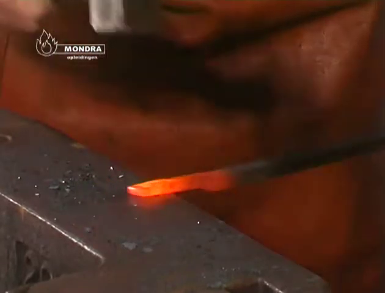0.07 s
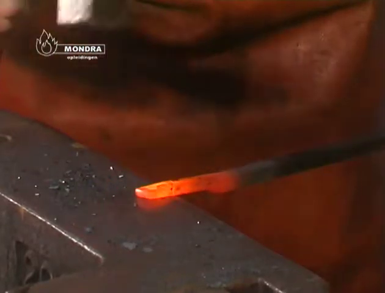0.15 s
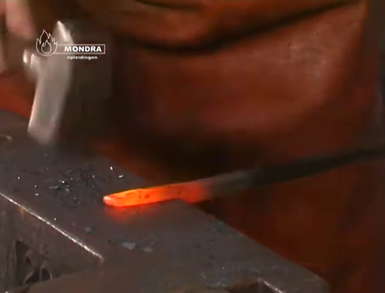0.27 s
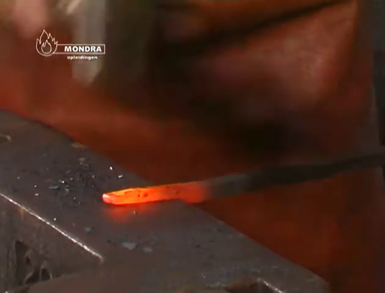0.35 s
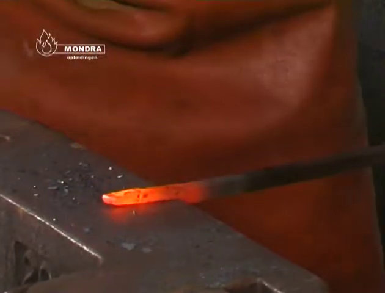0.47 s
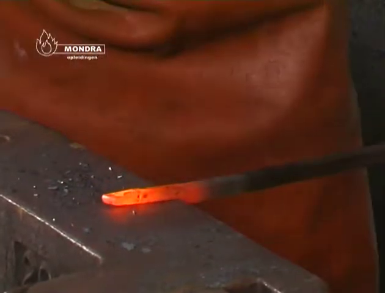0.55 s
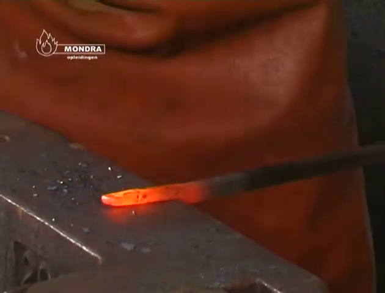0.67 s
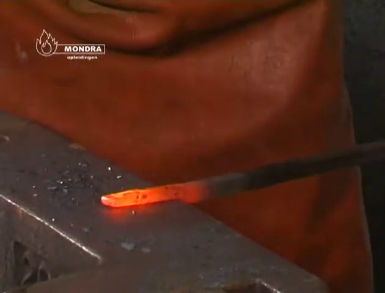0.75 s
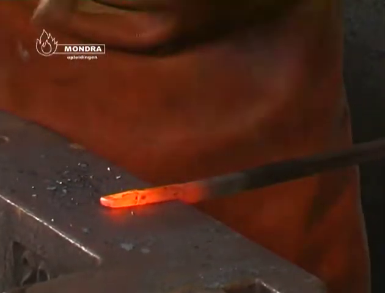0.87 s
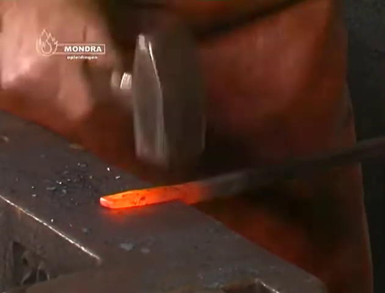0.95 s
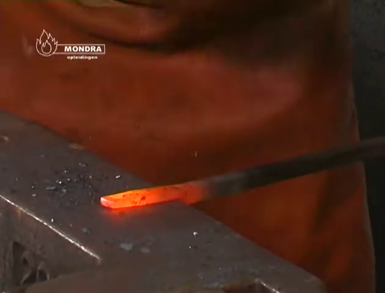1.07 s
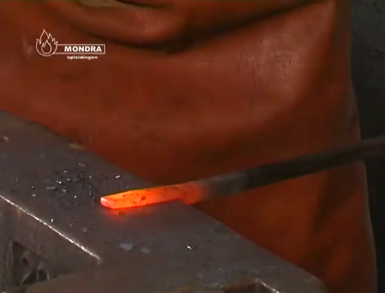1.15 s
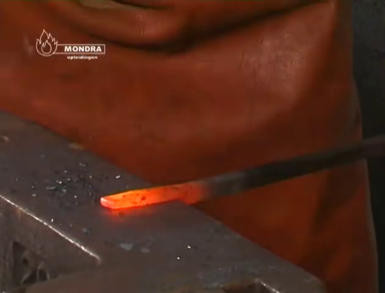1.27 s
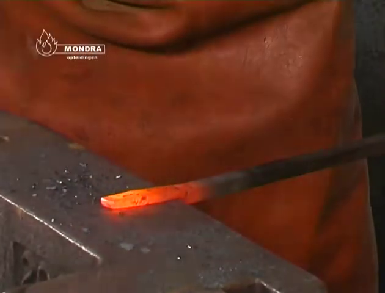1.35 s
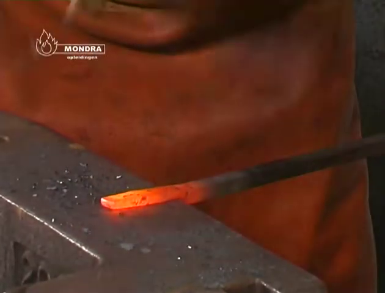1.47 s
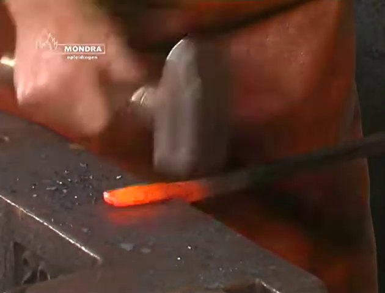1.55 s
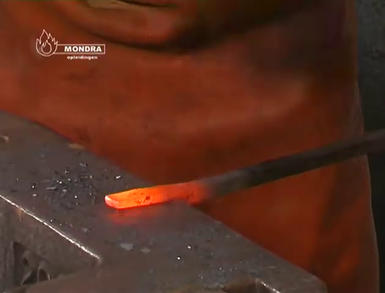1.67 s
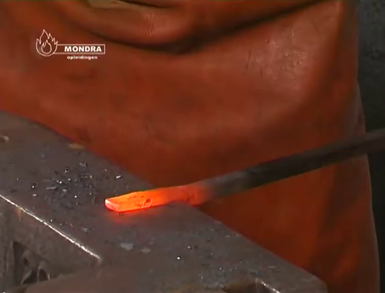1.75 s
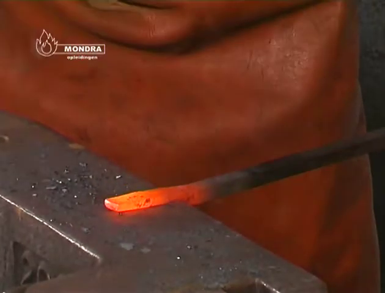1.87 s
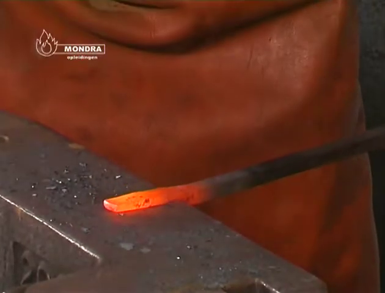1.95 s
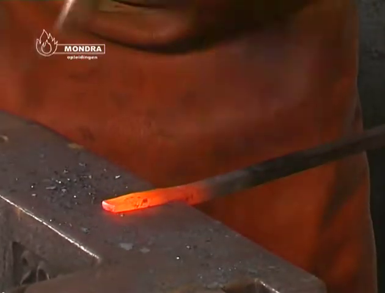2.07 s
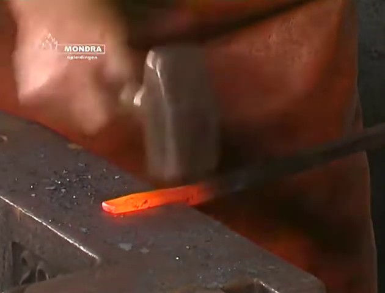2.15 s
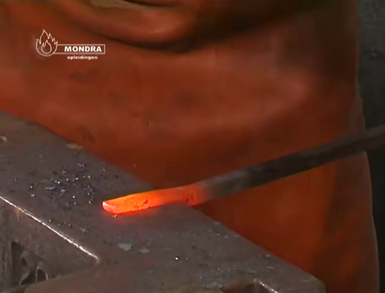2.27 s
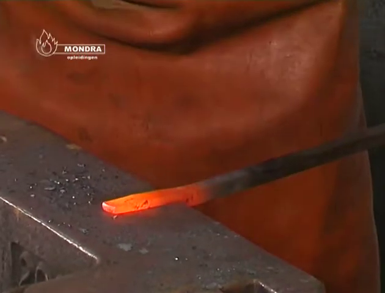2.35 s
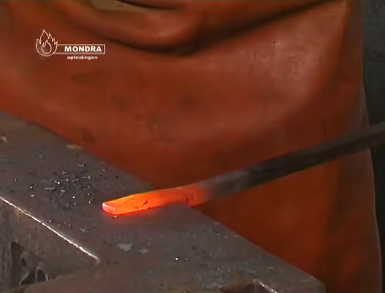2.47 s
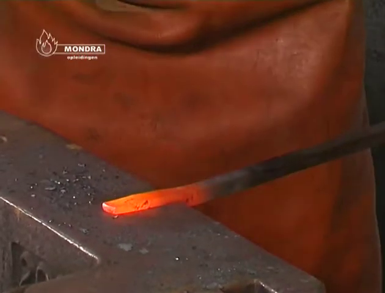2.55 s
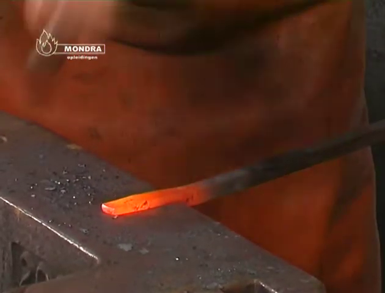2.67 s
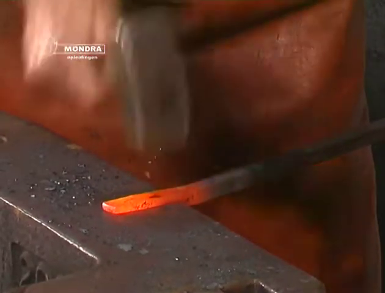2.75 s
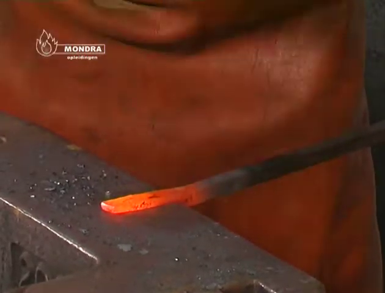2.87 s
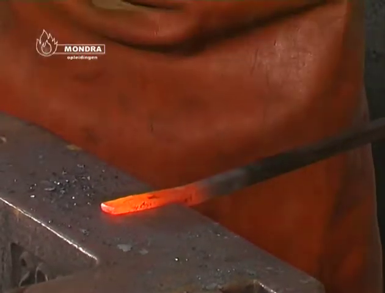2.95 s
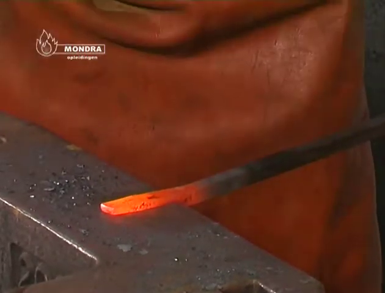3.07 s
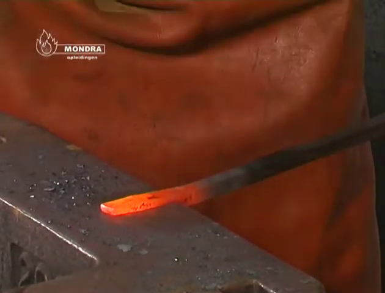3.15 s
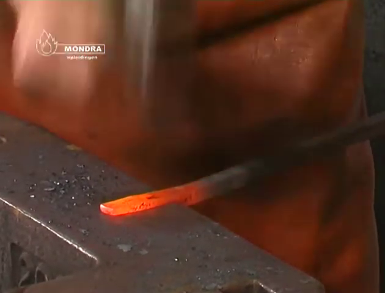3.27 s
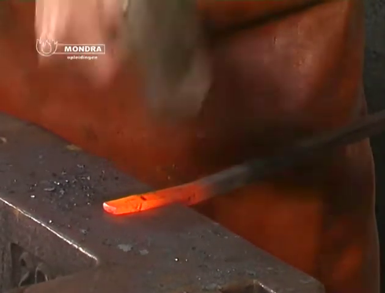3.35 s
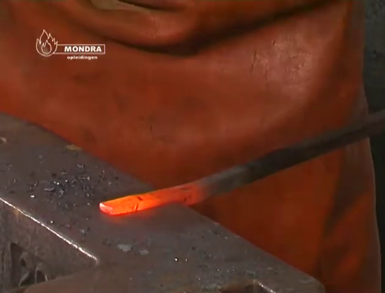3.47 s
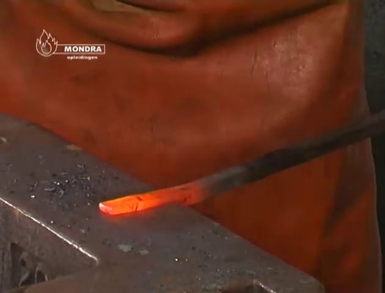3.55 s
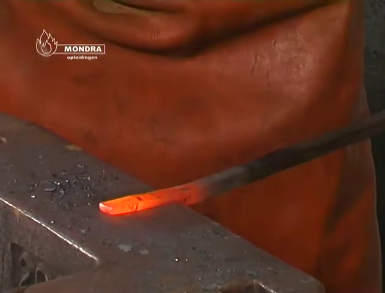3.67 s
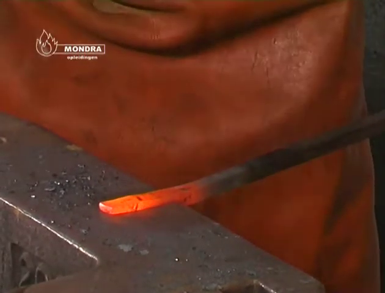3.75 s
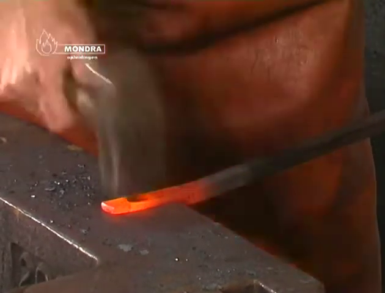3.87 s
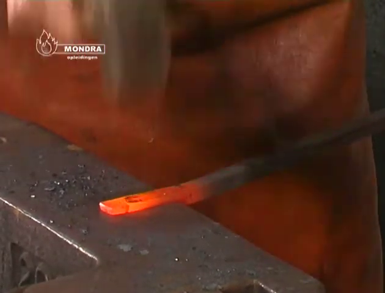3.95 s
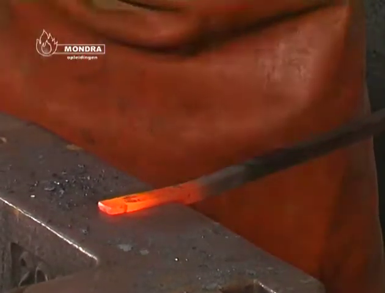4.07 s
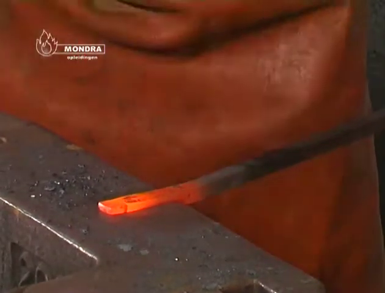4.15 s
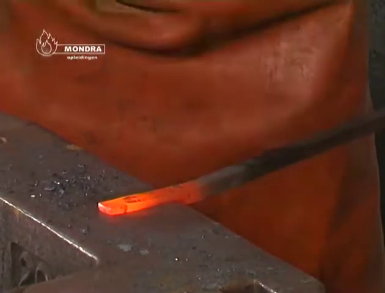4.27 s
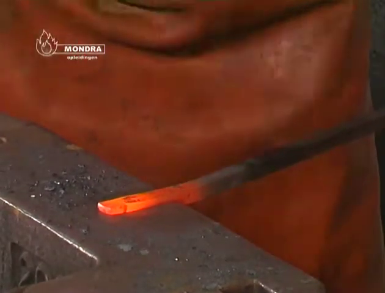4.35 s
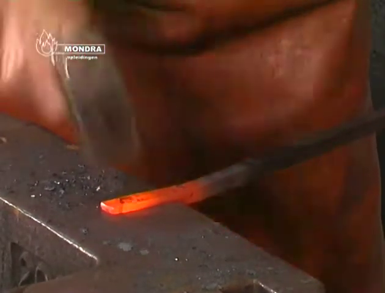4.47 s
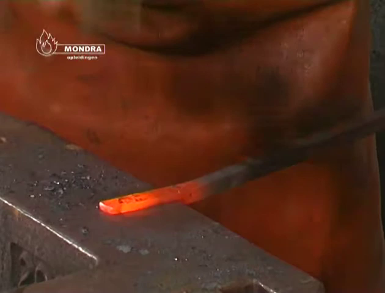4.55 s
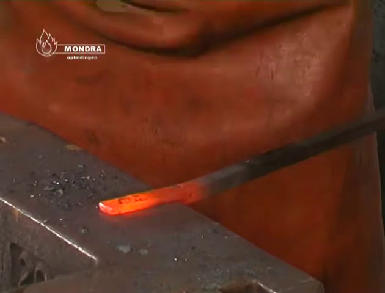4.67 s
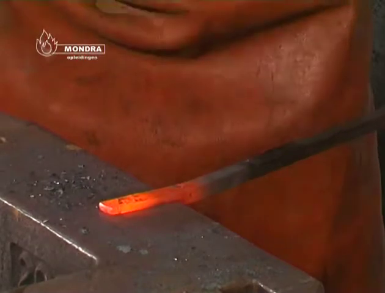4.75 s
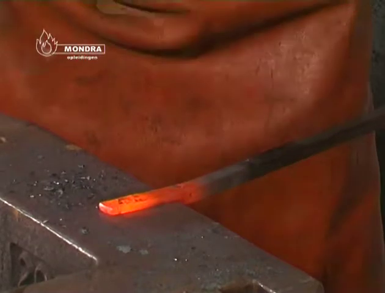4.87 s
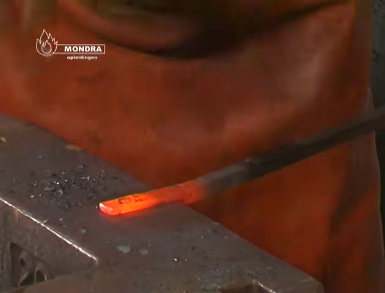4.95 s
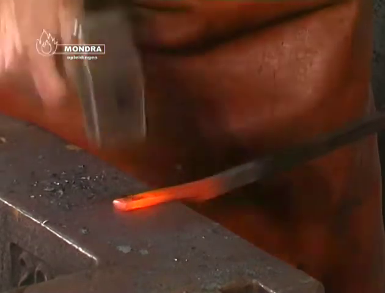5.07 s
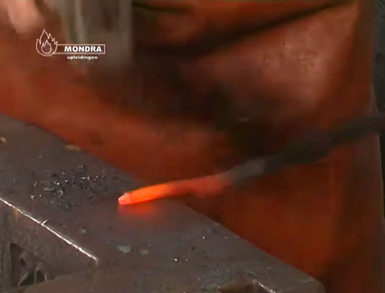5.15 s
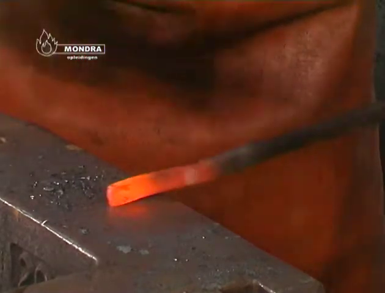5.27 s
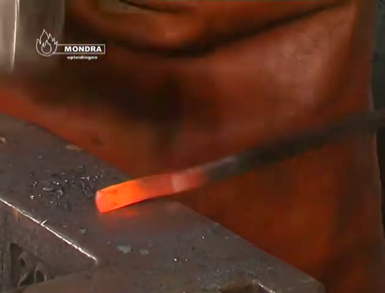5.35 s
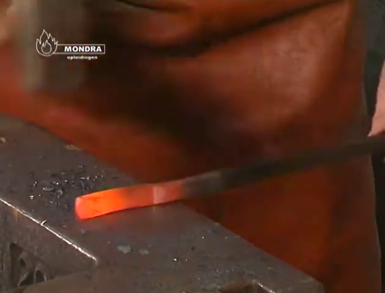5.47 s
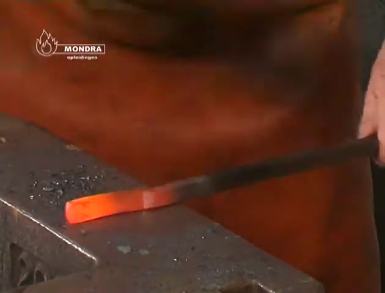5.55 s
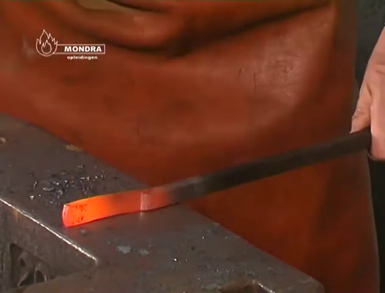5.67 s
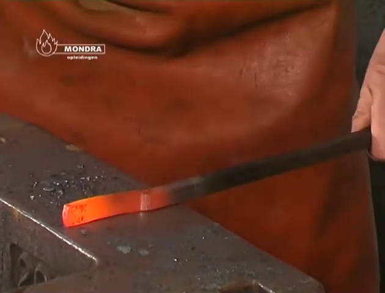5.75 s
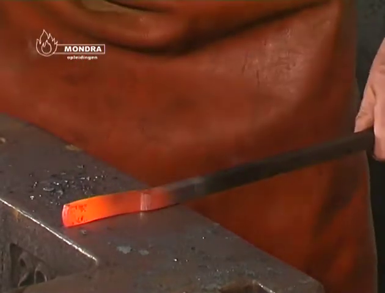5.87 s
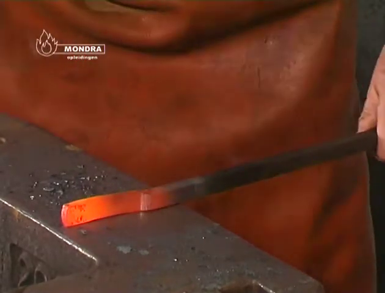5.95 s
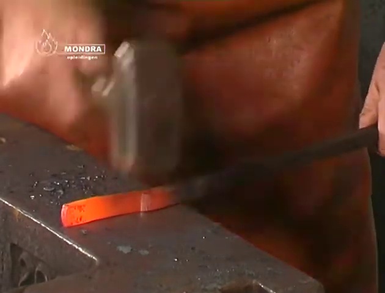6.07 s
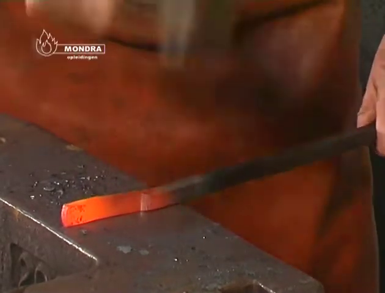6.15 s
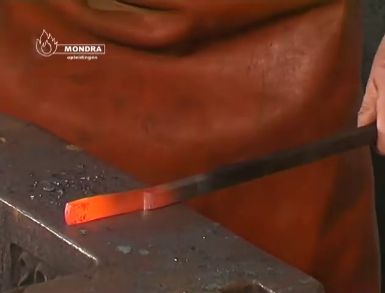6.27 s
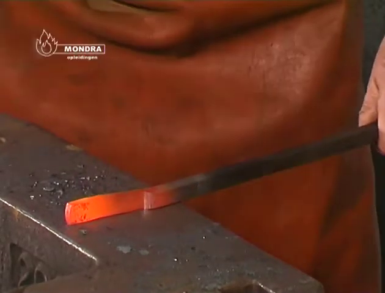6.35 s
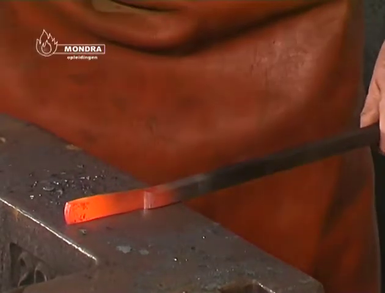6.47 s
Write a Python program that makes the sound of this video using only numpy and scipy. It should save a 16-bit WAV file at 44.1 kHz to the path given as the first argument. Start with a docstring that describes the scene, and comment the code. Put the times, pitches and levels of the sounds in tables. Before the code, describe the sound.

Steady hammer blows crash on a glowing bar, the anvil ringing after each, with two cleaner taps on bare steel and a low blower hiss behind.

```python
"""Nearly two hammer blows a second strike a hot bar on an anvil in a hard-walled workshop.
Each blow is a burst of filtered noise and damped tones, a set of ringing anvil tones and a low floor thump.
Twice the hammer drops on the bare face while the bar is turned, which gives a cleaner ring.
Behind it lie blower rumble, hiss and a thin whine. A limiter turns down the loud moments."""
import sys
import numpy as np
from scipy import signal
from scipy.fft import rfft, irfft, next_fast_len
from scipy.io import wavfile
from scipy.ndimage import uniform_filter1d

SR = 44100
rng = np.random.default_rng(int(sys.argv[2]) if len(sys.argv) > 2 else 0)


def wrap_up_sound(samples):
    """Save the sound to the file named by the first command line argument, as 16-bit audio."""
    columns = np.atleast_2d(samples).T
    # keep every value between -1 and 1, then stretch to whole-number steps
    tamed = np.clip(columns, -1, 1)
    steps = np.round(tamed * 32767).astype(np.int16)
    wavfile.write(sys.argv[1], SR, steps)


N = 287071

# Overtones of anvil and hammer. Columns: f/Hz, t60/s (time to fall 60 dB), relative level through the bar/dB,
# change of level per unit of place/dB, relative level on the bare face/dB
OVERTONES = [(1197.0, 0.62, -41.4, -3.6, -38.5), (2222.0, 1.2, -41.9, -4.0, -50.0),
             (2928.0, 0.7, -37.6, -2.9, -38.0), (3145.0, 0.6, -46.8, -3.6, -43.0),
             (3217.0, 0.8, -43.0, -5.1, -37.4), (3298.0, 0.9, -39.4, 0.3, -48.0),
             (4171.0, 1.2, -39.1, 4.7, -41.1), (4472.0, 0.5, -46.9, -0.2, -38.9),
             (4674.0, 0.75, -40.3, 2.5, -36.9), (4713.0, 0.8, -45.7, 3.7, -37.5),
             (5171.0, 0.8, -32.4, 1.9, -30.6), (5259.0, 1.3, -38.1, -6.5, -37.7),
             (5643.0, 0.55, -48.1, 0.9, -39.4), (6050.0, 0.6, -39.8, -3.2, -51.6),
             (6083.0, 0.5, -36.0, -4.8, -34.6), (6789.0, 0.42, -48.6, -3.3, -39.9),
             (6940.0, 0.4, -54.5, -6.5, -46.7), (7408.0, 0.55, -41.0, 2.9, -55.3),
             (7554.0, 0.4, -48.7, -1.4, -63.1), (7918.0, 0.45, -48.8, -1.4, -66.1),
             (8109.0, 0.4, -48.1, 2.6, -65.4), (8676.0, 0.42, -45.5, 6.7, -59.8),
             (9061.0, 0.45, -49.4, -1.6, -61.9), (10514.0, 0.4, -53.8, -0.3, -71.6),
             (10843.0, 0.3, -53.3, -0.0, -96.7), (11933.0, 0.33, -56.4, 10.7, -82.8),
             (12342.0, 0.45, -51.6, 9.0, -82.3), (13002.0, 0.33, -55.5, -3.2, -62.4),
             (13172.0, 0.3, -45.6, 5.4, -77.4)]
AGE = np.arange(int(1.3 * SR)) / SR   # seconds since a blow
EARLY = int(0.2 * SR)   # samples at the start of a blow over which its loudness is set


def from_db(db):
    """Turn decibels into a plain multiplier."""
    return 10 ** (np.asarray(db) / 20)


def at_hz(points, hz):
    """Read a curve of (Hz, value) points, with pitch on a logarithmic scale."""
    known_hz, values = np.transpose(points)
    return np.interp(np.log(np.maximum(hz, 1)), np.log(known_hz), values)


def early_rms_one(x):
    """Scale a sound so that its early part has an rms of 1."""
    return x / np.sqrt(np.mean(x[..., :EARLY] ** 2))


def dying(t60):
    """Envelope that falls 60 dB in t60 seconds."""
    return np.exp(-np.log(1000) * AGE / t60)


def delayed(x, s):
    """Make a sound start s seconds later, at the same length."""
    return np.pad(x, (max(round(s * SR), 0), 0))[:len(x)]


def add(out, sound, s):
    """Mix a stereo sound in from time s on, cutting off what falls outside."""
    at = round(s * SR)
    first, last = max(at, 0), min(at + sound.shape[1], N)
    out[:, first:last] += sound[:, first - at:last - at]


def coloured(x, *spectra):
    """Filter that gives white noise of rms 1 the summed spectra (dB per Hz), with no sound ahead of time."""
    size = 2 * next_fast_len(x.shape[-1] // 2 + 2048)
    hz = np.arange(size // 2 + 1) * SR / size
    level_db = sum(at_hz(points, hz) for points in spectra)
    gain = from_db(level_db) * np.sqrt(SR / 2)
    # the folded cepstrum gives the minimum-phase filter: the earliest response with this gain
    cepstrum = irfft(np.log(gain))[:size // 2]
    cepstrum[1:] *= 2
    response = np.exp(rfft(cepstrum, size))
    return irfft(rfft(x, size) * response)[..., :x.shape[-1]]


def stereo_noise(size, alike):
    """White noise whose left and right have the correlation alike (1 = the same)."""
    mid, side = rng.standard_normal((2, size))
    alike = np.clip(alike, -1, 1)
    middle = np.sqrt(1 + alike) * mid
    width = np.sqrt(1 - alike) * side * [[1], [-1]]
    return (middle + width) / np.sqrt(2)


def narrow_bass(x, below_hz=190):
    """Long waves reach both microphones nearly alike, so the bass has little left-right difference."""
    high_pass = signal.butter(1, below_hz, "high", fs=SR, output="sos")
    side = signal.sosfilt(high_pass, (x[0] - x[1]) / 2)
    return x.mean(0) + side * [[1], [-1]]


def ring(x, hz, t60):
    """One decaying mode driven by x, as a two-pole resonance."""
    r, w = np.exp(-np.log(1000) / (t60 * SR)), 2 * np.pi * hz / SR
    return signal.lfilter([0, np.sin(w)], [1, -2 * r * np.cos(w), r * r], x)


def background(whine_hz=15500, whine_db=-76):
    """Steady blower rumble and hiss from filtered noise, and a faint electronic whine from a sine."""
    # forge blower and hiss. Columns: f/Hz, level/dB per Hz
    hum_and_hiss = [(20, -76), (60, -73.5), (150, -78), (215, -72.5), (310, -88.5), (600, -94.5),
                    (1500, -82), (5000, -83), (7500, -89.5), (10000, -104), (15000, -122)]
    whine = from_db(whine_db) * np.sqrt(2) * np.sin(2 * np.pi * whine_hz * np.arange(N) / SR)
    return coloured(stereo_noise(N, alike=0.52), hum_and_hiss) + whine


def workshop(alike=0.28, low_mid_alike=-0.021, build_s=0.0027):
    """Dense echoes build up quickly, mostly die sooner in the treble, and spread widest below 900 Hz."""
    # how long the room rings. Columns: f/Hz, t60/s
    room_t60 = [(100, 1.7), (500, 1.204), (1500, 1.375), (2500, 1.277), (4500, 0.79), (7000, 0.76),
                (10000, 0.44), (14000, 0.44)]
    edges = np.r_[0, np.geomspace(900, 13000, 9), SR / 2]
    size = next_fast_len(len(AGE))
    hz = np.arange(size // 2 + 1) * SR / size
    low_part = rfft(stereo_noise(size, low_mid_alike))
    high_part = rfft(stereo_noise(size, alike))
    spectrum = np.where(hz < edges[1], low_part, high_part)
    tail = 0
    for low, high in zip(edges, edges[1:]):
        band = irfft(spectrum * ((hz >= low) & (hz < high)), size)[:, :len(AGE)]
        tail = tail + band * dying(at_hz(room_t60, (low + high) / 2))
    return early_rms_one(tail * (1 - np.exp(-AGE / build_s)))


def to_microphones(room, direct):
    """The straight path plus the room's echoes."""
    return room / np.sqrt(np.sum(room[0] ** 2)) + direct * signal.unit_impulse(len(AGE))


def thump(late_s=0.01202, lead=0.11):
    """The stand passes the blow to the floor; its two lowest modes beat about eight times a second."""
    # stand, floor and low room modes. Columns: f/Hz, t60/s, relative level/dB
    stand = [(59.6, 1.9, -38), (67.9, 1.33, -40), (98.1, 1.53, -45), (116.3, 2.03, -46),
             (143.8, 1.2, -47.5), (176, 0.71, -45.5), (199, 6.1, -55), (223.7, 2.03, -53)]
    phase = np.array([[lead], [-lead]]) / 2   # radians: left leads right
    modes = 0
    for k, (hz, t60, db) in enumerate(stand):
        mode = early_rms_one(np.sin(2 * np.pi * hz * AGE + phase) * dying(t60))
        modes = modes + (-1) ** k * from_db(db) * mode   # every other mode is turned over
    soft_start = 1 - dying(0.087)
    return np.array([delayed(side * soft_start, late_s) for side in modes])


def bar_partials(t60=0.11, count=150):
    """The many weak, quickly damped modes of bar and hammer head: partials x time."""
    hz = np.linspace(1400, 14300, count) + rng.uniform(-45, 45, count)
    return np.sin(2 * np.pi * hz[:, None] * AGE[:EARLY]) * dying(t60)[:EARLY]


def crash(room, partials, direct_db, clang_t60, partials_db, same_path=0.12, crack_db=-8.5, echoes_db=-3.0):
    """Hammer contact gives a crack, a short clang, damped tones and echoes that partly repeat each blow."""
    crack = early_rms_one(delayed(signal.unit_impulse(len(AGE)), 0.0003))
    clang = early_rms_one(rng.standard_normal(len(AGE)) * dying(clang_t60))
    clang = signal.sosfilt(signal.butter(1, 2000, "high", fs=SR, output="sos"), clang)
    same_path = np.clip(same_path, 0, 1)
    echoes = np.sqrt(same_path) * room + np.sqrt(1 - same_path) * workshop()
    # every blow shares its energy out anew among the partials
    jangle = rng.standard_normal(len(partials)) @ partials
    jangle = signal.fftconvolve(to_microphones(room, direct=1.0), jangle[None], axes=1)
    jangle = early_rms_one(jangle[:, :len(AGE)])
    dry_part = from_db(crack_db) * crack + from_db(direct_db) * clang
    return dry_part + from_db(echoes_db) * echoes + from_db(partials_db) * jangle


def overtones(room, wet_db=-4):
    """Each overtone sounds fully from the strike on, then swells in the room: modes x channels x time."""
    modes = []
    for hz, t60, *_ in OVERTONES:
        direct = early_rms_one(np.sin(2 * np.pi * hz * AGE) * dying(t60)) * rng.choice([-1, 1])
        swell = early_rms_one(ring(room, hz, t60 / 2) * dying(3.6))
        modes.append(early_rms_one(direct + from_db(wet_db) * swell))
    return np.array(modes)


def main_note(room, note_hz=1431, split_hz=1.063, twin=0.8, t60=1.82, echo_s=0.064, echo=1.0,
              wet_db=-8, pan_db=1.9):
    """The anvil's bending mode is a slowly beating pair; the far wall's echo returns in step and swells it."""
    lower = np.sin(2 * np.pi * note_hz * AGE)
    upper = twin * np.sin(2 * np.pi * (note_hz + split_hz) * AGE)
    pair = (lower + upper) * dying(t60)
    whole_cycles_s = round(echo_s * note_hz) / note_hz
    note = early_rms_one(pair + echo * delayed(pair, whole_cycles_s))
    diffuse = early_rms_one(ring(room, note_hz, t60=0.12))
    sides = [early_rms_one(side) for side in note + from_db(wet_db) * diffuse]
    return np.array(sides) * from_db([[pan_db], [-pan_db]])


def blow_levels(s, force_db, free_db, place):
    """Crash, main note and thump follow the force, the grip on the anvil, the thinning bar and the place."""
    # columns of all five: crash low-mid, crash upper-mid, crash treble, main note, thump
    normal_db = (4.97, 3.5, 9.4, 1.2, 0.7)   # a blow of normal force at time zero [dB]
    force_share = (0.069, 1, 0.13, .15, 0.12)   # [dB per dB of force]
    ring_share = (0.24, 0.069, 0.18, 0.34, 0)   # [dB per dB of freedom to ring]
    thinning = (-0.47, -0.039, 0.012, -.85, -0.36)   # change as the bar gets thinner [dB per s]
    place_db = (0.18, 0.06, -0.88, -0.43, -1.4)   # change from the middle of the face to place 1 [dB]
    return normal_db + np.dot([force_db, free_db, s, place], [force_share, ring_share, thinning, place_db])


def tap_levels(hardness_db):
    """On the bare face a harder contact makes the crash brighter and takes away body."""
    # columns of both: crash low-mid, crash upper-mid, crash treble, main note, thump
    normal_db = (-2.4, -1.5, -29, -12.5, -7.5)   # a tap of normal hardness [dB]
    hardness_share = (-1, -0.5, 1.5, -2.5, -2)   # [dB per dB of hardness]
    return normal_db + hardness_db * np.array(hardness_share)


def hammering(note_db=-23.5, scatter_db=0.9, body_hz=600, bar_ring_db=3, face_ring_db=2.5):
    """Hot iron cushions a blow into a broad crash; the bare face gives a cleaner ring."""
    # blows on the hot bar, the first just before time zero.
    # Columns: t/s, force/dB, freedom of the anvil to ring/dB, place on the face (0 = middle)
    blows = [(-0.13, -12.5, -10.5, -0.61), (0.9303, 1.5, 2, -0.5), (1.5358, -.3, -0.5, -0.41),
             (2.1322, 0.9, -1.3, -0.4), (2.7134, 1.3, 0.5, 0.46), (3.2928, 1.5, 0.3, 0.87),
             (3.8639, -1.7, -0.5, 0.76), (4.4355, -2.5, -1, 0.37), (5.0165, -0.5, .8, 0.65),
             (6.0389, -5, -14, -1.7)]
    # taps on the bare face. Columns: t/s, hardness of the contact/dB
    taps = [(0.2647, -1.5), (5.404, 2)]
    # crash on the bar and on the bare face, before the colouring below. Columns: f/Hz, level/dB per Hz
    bar_crash = [(40, -64), (150, -72.5), (300, -72.5), (500, -81.5), (750, -70.5), (1050, -67.5),
                 (1500, -62.5), (2200, -60.5), (2700, -61.5), (3300, -59), (4700, -59), (7000, -68.5),
                 (13200, -83), (15500, -101.5)]
    face_crash = [(40, -87), (300, -71.5), (500, -106), (750, -75), (1050, -73.5), (1600, -64),
                  (2700, -59.5), (3800, -60), (4700, -53.5), (5600, -62), (7000, -58.5), (9000, -59),
                  (12000, -67.5), (15000, -73)]
    # centres of low-mid, upper-mid and treble [Hz]
    colour_hz = (1700, 4000, 10000)

    room, out = workshop(), np.zeros((2, N))
    modes, note, low, partials = overtones(room), main_note(room), thump(), bar_partials()
    mode_hz, _, bar_db, place_db, face_db = np.transpose(OVERTONES)
    # hardness tilts the overtones about 2950 Hz: dB per octave for each dB of hardness
    tilt = 1.24 * np.log2(mode_hz / 2950)

    strokes = []
    for s, force_db, free_db, place in blows:
        # where the hammer lands decides which overtones speak
        modes_db = bar_ring_db + free_db + bar_db + place * place_db
        noise = crash(room, partials, direct_db=-9.5, clang_t60=0.44, partials_db=-7)
        strokes.append((s, blow_levels(s, force_db, free_db, place), bar_crash, modes_db, noise))
    for s, hardness_db in taps:
        modes_db = face_ring_db + face_db + hardness_db * tilt
        noise = crash(room, partials, direct_db=-2, clang_t60=0.19, partials_db=-2)
        strokes.append((s, tap_levels(hardness_db), face_crash, modes_db, noise))

    for s, (*colour_db, main_db, thump_db), spectrum, modes_db, noise in strokes:
        strengths = from_db(modes_db + scatter_db * rng.standard_normal(len(modes)))
        # the stroke's own levels colour the crash above its low body
        colour = [(body_hz, 0), *zip(colour_hz, colour_db)]
        sound = narrow_bass(coloured(noise, spectrum, colour))
        sound = sound + np.tensordot(strengths, modes, 1)
        sound = sound + from_db(note_db + main_db) * note
        add(out, sound + from_db(thump_db) * low, s)
    return out


def scene(pan_db=-0.33):
    """The hammering over the background, with the anvil almost straight ahead."""
    return (hammering() + narrow_bass(background())) * from_db([[pan_db], [-pan_db]])


def limiter(x, threshold_db=-20, slope=0.16, release_db_per_s=90):
    """The gain drops almost at once on a loud sound and comes back at a steady rate."""
    power = uniform_filter1d(np.mean(x ** 2, 0), size=130)
    level_db = 10 * np.log10(np.maximum(power, 1e-12))
    wanted_cut_db = slope * np.maximum(level_db - threshold_db, 0)
    recovery_db = release_db_per_s * np.arange(N) / SR
    # the running maximum holds each cut while the recovery lets it go
    cut_db = np.maximum.accumulate(wanted_cut_db + recovery_db) - recovery_db
    return x * from_db(-uniform_filter1d(cut_db, size=40))


def record(dry, top=0.47, cutoff_hz=16300):
    """The recorder's limiter, then rounded peaks, then a steep cut of the highest treble."""
    rounded = top * np.tanh(limiter(dry) / top)
    return signal.sosfilt(signal.ellip(10, 0.1, 80, cutoff_hz, fs=SR, output="sos"), rounded)


dry = scene()
out = record(dry)
wrap_up_sound(out)
```